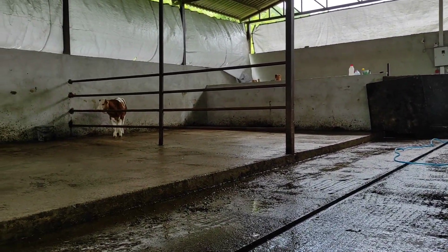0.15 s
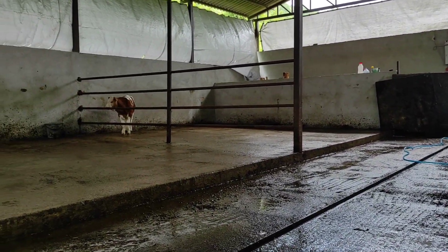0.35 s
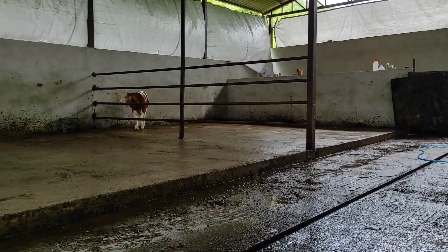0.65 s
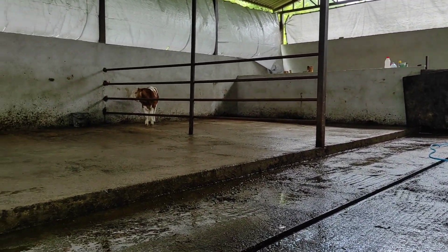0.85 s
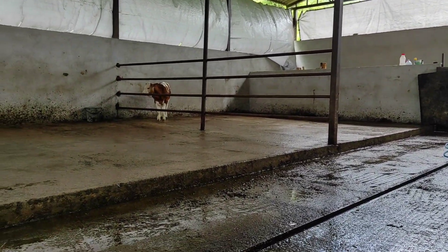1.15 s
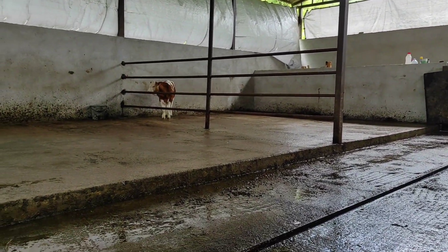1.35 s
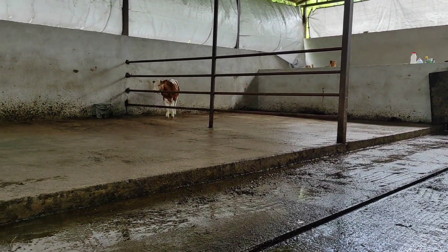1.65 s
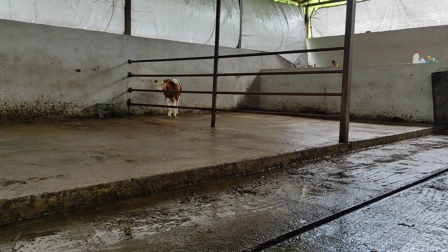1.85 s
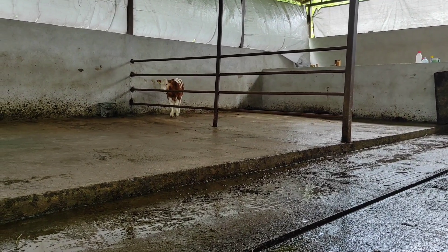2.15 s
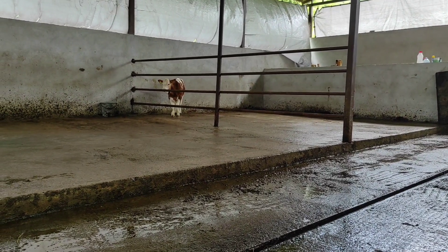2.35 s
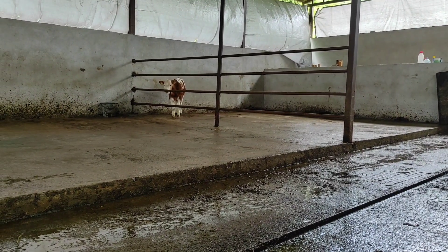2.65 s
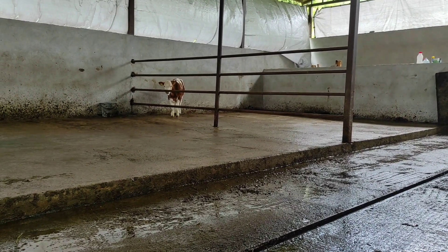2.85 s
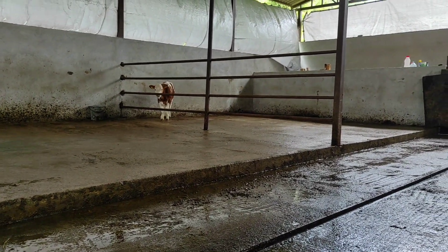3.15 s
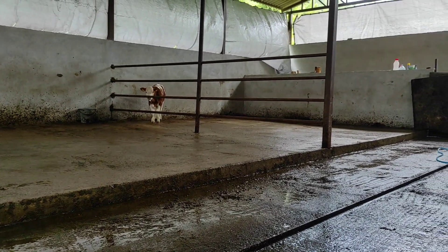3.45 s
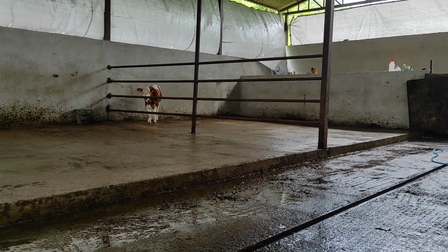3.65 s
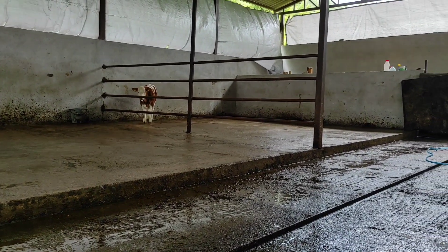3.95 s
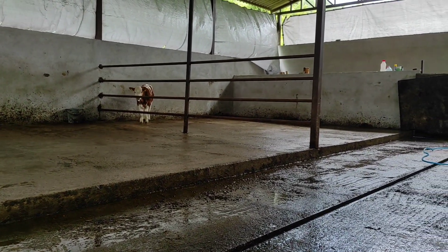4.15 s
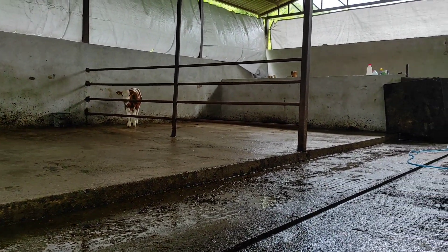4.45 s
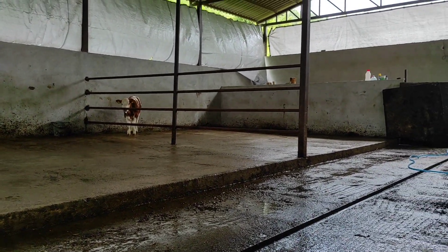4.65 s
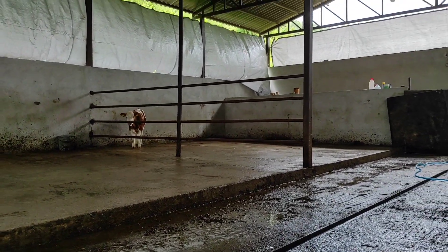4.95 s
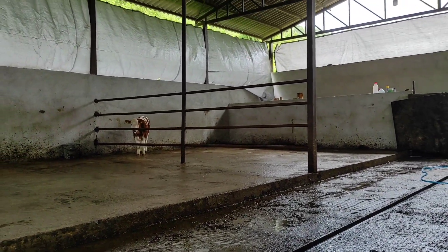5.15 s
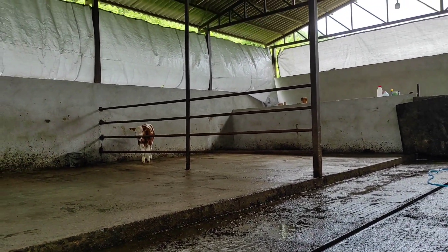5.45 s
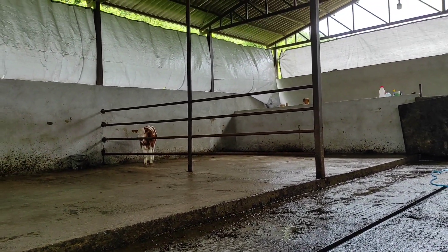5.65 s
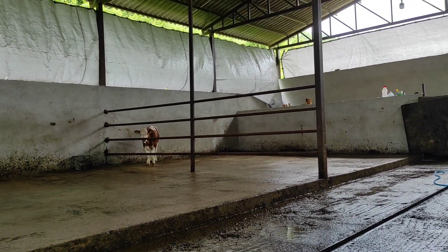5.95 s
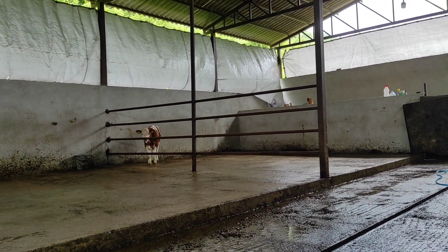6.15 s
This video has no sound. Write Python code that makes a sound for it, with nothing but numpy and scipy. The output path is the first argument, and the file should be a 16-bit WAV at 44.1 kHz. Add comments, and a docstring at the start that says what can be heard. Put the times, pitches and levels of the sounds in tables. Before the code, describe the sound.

Gritty scrapes of a metal blade on a wet barn floor, with clunks, small water spits and soft footfalls between strokes, walls echoing.

```python
"""Scraping a wet barn floor

A steel scraper is shoved over wet concrete in a barn: it lands lightly, is leaned on, eases and lifts.
Random clicks through filters make its juddering edge, the grinding grit and the swishing film of water.
Single impulses with short noise bursts make knocks, footfalls and spits; resonances make the blade ring.
Filtered noise makes a faint hiss like running water, low air and handling rumble; bare walls echo the work.
The microphone ports (openings) of a hand-held phone add a sharp treble resonance."""
import sys
import numpy as np
from scipy import signal
from scipy.fft import rfft, irfft, next_fast_len
from scipy.io import wavfile

SR = 44100
rng = np.random.default_rng(int(sys.argv[2]) if len(sys.argv) > 2 else 0)


def unload_wav(signal):
    """Save mono or channel-first audio to the path in sys.argv[1] as 16-bit WAV at rate SR, clipped to [-1, 1]."""
    wavfile.write(
        sys.argv[1],
        SR,
        np.round(np.clip(np.atleast_2d(signal).T, -1, 1) * 32767).astype(np.int16),
    )


N = 277389  # length in samples
TIME = np.arange(N) / SR  # seconds
SIZE = next_fast_len(N + SR)  # room for one extra second, so that filter tails do not wrap round
FREQ = np.arange(SIZE // 2 + 1) * SR / SIZE  # Hz

# Levels in the tables are relative: the functions trim, filter and mix each layer afterwards.
# Background hiss over time. Each row: time in seconds, level in dB.
HISS_LEVEL = [(0.0, -49), (0.18, -50.5), (0.29, -42), (0.5, -45.5), (1.75, -45), (2.42, -40.5),
              (2.62, -37.5), (2.8, -44), (5.0, -40), (5.8, -43), (6.29, -39)]
# Tone of the hiss. Each row: frequency in Hz, level in dB.
HISS_TONE = [(100, -15), (500, -5.5), (1300, -3), (3000, 0), (5000, 0), (7000, 3.5), (8500, 3.5),
             (11000, -4), (15000, -2.5)]
# Low air of the barn over time. Each row: time in seconds, level in dB.
AIR_LEVEL = [(0.0, -58.5), (1.7, -58.5), (2.4, -54), (3.2, -51.5), (3.7, -61.5), (6.29, -63.5)]
# Tone of the low air. Each row: frequency in Hz, level in dB.
AIR_TONE = [(25, -28), (100, -30), (150, 0), (230, 1.5), (400, -1.5), (700, -6.5), (1100, -6.5),
            (2000, -28)]
# Handling rumble over time. Each row: time in seconds, level in dB.
RUMBLE_LEVEL = [(0.0, -67), (1.1, -59.5), (1.6, -66), (2.3, -71), (2.65, -51), (3.3, -56), (5.1, -62),
                (6.29, -75)]
# Reverberation of the barn. Each row: frequency in Hz, time to die by 60 dB in seconds.
BARN_DECAY = [(150, 0.24), (550, 0.37), (800, 0.29), (1000, 0.45), (1400, 0.41), (2000, 0.42), (3200, 0.46),
              (7000, 0.3)]
# Treble resonance of the phone's ports: left in Hz, right in Hz.
PORT_HZ = (7570, 7310)
# Soft footfalls. Each row: time in seconds, level in dB.
STEPS = [(1.986, -42), (2.449, -37), (2.489, -52), (3.223, -40.5), (3.247, -50)]
# Water spitting from under the edge. Each row: time in seconds, level in dB.
SPITS = [(1.1563, -28), (2.082, -18.5), (2.5536, -24), (2.9544, -15), (3.0121, -19), (4.913, -14.5),
         (5.4412, -18)]
# The lifted scraper skimming back: middle in seconds, half length in seconds, level in dB.
SKIM = (2.3, 0.084, -55)
# The blade landing or catching on a ridge. Each row: time in seconds, level in dB,
# share of the hard crack in dB, share of the low thud in dB.
KNOCKS = [(0.326, -8, -11, -18), (0.375, -10.5, -22, -11), (0.652, -15, 2.5, -25),
          (1.042, -12.5, -4.5, -26), (1.156, -6.5, -1.5, -6), (2.556, -2.5, -18, -15),
          (2.611, -3.5, -9, -6.5), (2.922, -12.5, -6, -10), (3.014, -4.5, -4, -24), (3.308, -9.5, -23, -11),
          (3.804, -8.5, -20, -10), (4.292, -20, 3, -16), (4.37, -1.5, -12, -14), (4.567, -7, -6.5, -23),
          (4.856, -7, -9, -22), (4.913, -7.5, -5, -16.5), (4.992, -20, -19, -18), (5.441, -17, -4, -22),
          (5.613, -15.5, -24, -29)]
# Ringing modes of the blade. Each row: frequency in Hz, width in Hz, level in dB.
BLADE_MODES = [(340, 110, -14), (645, 65, -13), (855.4, 22, -6), (965, 14, -8), (1030, 12, -4),
               (1041, 23, -3), (1556, 42, -4), (1762, 25, 0), (2200, 22, -26)]
# Tones of the contact. Each row: frequency in Hz, level in dB.
JUDDER_TONE = [(40, -28.5), (105, -31), (150, -7), (210, -2.5), (280, 0.5), (420, 2), (580, 1), (720, -4),
               (900, -15), (1500, -28.5), (4000, -60.5)]
GRIND_TONE = [(150, -32), (450, -0.5), (700, -1), (900, 3.5), (1080, -1), (1350, -5), (2100, -10),
              (2900, -14), (5000, -30.5), (12000, -46.5)]
SWISH_TONE = [(900, -24.5), (1800, 9.5), (3000, 3), (4500, 3), (7000, 2), (9000, 1.5), (11000, -25),
              (15000, -22)]
CRACK_TONE = [(400, -16), (1200, 2.5), (2000, 10.5), (3000, -10), (6000, -9.5), (14000, -33)]
# Shoves. Each row: edge lands in seconds, full push in seconds, edge lifts in seconds,
# time to lean on in seconds, lighter on landing in dB, judder in dB, grinding in dB, swish in dB,
# sag of the push in dB per second.
STROKES = [ (-0.3, -0.1, 0.0097, 0.065, 8, -39, -32.5, -44.5, 16),
           (0.323, 0.497, 0.65, 0.084, 10.5, -29.5, -25.5, -41, 44),
           (1.027, 1.167, 1.341, .01, 12, -28, -25, -38.5, 45.5),
           (2.555, 2.614, 2.73, .025, 4.5, -32.5, -30, -38, 48),
           (2.917, 2.972, 3.036, 0.014, 7, -30, -27, -40, 0),
           (3.297, 3.378, 3.505, 0.052, 10, -32, -28, -44.5, -12),
           (3.799, 3.875, 4.002, 0.026, 9.5, -31, -28, -46, -2),
           (4.293, 4.37, 4.43, 0.0088, 11.5, -31.5, -24, -41.5, 10),
           (4.483, 4.537, 4.543, 0.057, 6.5, -38, -20.5, -42.5, 13),
           (4.849, 4.951, 5.108, 0.039, 9.5, -28.5, -24.5, -38, 15),
           (5.441, 5.552, 5.69, 0.079, 17.5, -30.5, -29.5, -44, 0.5), ]
# How a shove shapes each layer. Each row: share of the lightness on landing, extra sag in dB per second,
# release in dB per second.
JUDDER_SHAPE = (0.64, 33.6, 250)
GRIND_SHAPE = (0.84, 0.34, 208)
SWISH_SHAPE = (1.1, 2, 178)

LANDING_S = 0.0019  # time for the edge to settle on the floor
TOP_HZ = 15400  # the sound is cut above this


def undb(db):
    """Turn decibels into a gain."""
    return 10 ** (np.asarray(db) / 20)


def unit(x):
    """Scale a sound to an average (rms) strength of 1."""
    return x / np.sqrt(np.mean(x ** 2))


def follow(rows):
    """Gain over time, joining (seconds, dB) rows with straight lines in dB."""
    return undb(np.interp(TIME, *np.transpose(rows)))


def through(x, response):
    """Pass a sound through a filter given by its frequency response."""
    return irfft(rfft(x, SIZE) * response, SIZE)[..., :N]


def along(points):
    """Values at every frequency, joining (Hz, value) points over a logarithmic pitch scale."""
    hz, value = np.transpose(points)
    return np.interp(np.log(FREQ + 1), np.log(hz), value)


def colour(points):
    """Filter with the given (Hz, dB) outline that only sounds after its input (minimum phase)."""
    cepstrum = irfft(np.log(undb(along(points))), SIZE)
    causal = np.r_[cepstrum[0], 2 * cepstrum[1:SIZE // 2]]
    return np.exp(rfft(causal, SIZE))


def resonance(hz, width_hz):
    """One damped mode, with gain 1 at its centre."""
    return 1j * FREQ * width_hz / (hz ** 2 - FREQ ** 2 + 1j * FREQ * width_hz)


def walk(rate):
    """Random wandering around 0: straight lines between normal draws, 'rate' draws a second."""
    knots = rng.standard_normal(8192)
    return np.interp(TIME * rate, np.arange(len(knots)), knots)


def clicks(rate, spread_db):
    """Impulses at random times, about 'rate' a second, of uneven size and random sign, rms 1."""
    hit = rng.random(N) < rate / SR
    size = undb(spread_db * np.clip(rng.standard_normal(N), -2, 2))
    return unit(hit * size * rng.choice([-1, 1], N))


def blows(times, db, rattle_s, rattle):
    """Each blow is one impulse and a short dying rattle of the contact."""
    out = np.zeros(N)
    for t, gain in zip(times, undb(db)):
        start = max(int(t * SR), 0)
        age = TIME[:min(SR // 8, N - start)]
        burst = rng.standard_normal(len(age)) * np.exp(-age / rattle_s)
        out[start:start + len(age)] += gain * rattle * burst / np.linalg.norm(burst)
        out[start] += gain
    return out


def ports(pair, alike_hz):
    """Left and right from two unrelated spectra: long waves reach both ports alike, short ones do not."""
    alike = np.exp(-(FREQ / alike_hz) ** 2)
    mid = pair[0] * np.sqrt(1 + alike)
    side = pair[1] * np.sqrt(1 - alike)
    return np.array([mid + side, mid - side]) / np.sqrt(2)


def diffuse(points, alike_hz):
    """Noise from all around with the given spectrum, rms 1."""
    noise = rfft(rng.standard_normal((2, N)), SIZE)
    shaped = ports(noise, alike_hz) * undb(along(points))
    return unit(irfft(shaped, SIZE)[:, :N])


def running_hiss():
    """Noise like running water, wavering in level."""
    waver_db = 1.1 * walk(rate=36)
    return diffuse(HISS_TONE, alike_hz=400) * follow(HISS_LEVEL) * undb(-5.5 + waver_db)


def low_air():
    """Low noise of the air in the barn, swelling and fading at random."""
    return diffuse(AIR_TONE, alike_hz=328) * follow(AIR_LEVEL) * undb(3.4 * walk(rate=16))


def handling_rumble():
    """Deep, fitful noise from the hand on the phone."""
    rumble = diffuse([(25, -8.5), (80, -8.0), (200, -8.5), (600, -48)], alike_hz=25)
    return rumble * follow(RUMBLE_LEVEL) * undb(-4.5 + 4.6 * walk(rate=12))


def background():
    """The hiss, the low air and the rumble together."""
    return running_hiss() + low_air() + handling_rumble()


def tail(db):
    """Diffuse reverberation under the roof: it builds up quickly, and each band dies at its own rate."""
    age, hz = TIME[:SR], np.arange(SR // 2 + 1)
    edges = np.r_[0, np.geomspace(150, 9600, num=13), SR]  # band limits, Hz
    noise = rfft(rng.standard_normal((2, SR)))
    t60 = np.interp(hz, *np.transpose(BARN_DECAY))
    h = 0
    for lo, hi in zip(edges, edges[1:]):
        band = (hz >= lo) & (hz < hi)
        h = h + irfft(noise * band) * np.exp(-np.log(1000) * age / t60[band].mean())
    h = h * (1 - np.exp(-age / 0.019))  # build-up
    return undb(db) * h / np.linalg.norm(h, axis=1, keepdims=True)


def scatter(db, fade_s, density):
    """A quickly fading spray of reflections, different for each side, with the given energy."""
    size = rng.standard_normal((2, SR))
    present = rng.random((2, SR)) < density
    h = size * present * np.exp(-TIME[:SR] / fade_s)
    return undb(db) * h / np.linalg.norm(h, axis=1, keepdims=True)


def first_arrival(db, swing_rad, step_hz):
    """Sound bends round hand and phone: all pitches stay equally loud, but either port may lead."""
    knots = rng.standard_normal(512)
    wander = np.interp(FREQ / step_hz, np.arange(len(knots)), knots)
    # the lead changes sides along the spectrum and vanishes in the deepest lows
    phase = swing_rad * np.tanh(3 * wander) * FREQ / (FREQ + 90)
    return undb(db) * np.exp(1j * np.array([phase, -phase]))


def barn(x, shift_hz, count):
    """As the scraper travels, patterns of paths and echoes take turns in a repeating cycle; one tail stays."""
    out = through(x, ports(rfft(tail(db=-8), SIZE), alike_hz=318))
    for k in range(count):
        # each pattern fades in and out around its turn
        distance = np.abs((TIME * shift_hz - k + 1) % count - 1)
        share = np.cos(np.pi / 2 * np.minimum(distance, 1))
        spray = scatter(db=-6.5, fade_s=0.012, density=.05)
        near_walls = ports(rfft(spray, SIZE), alike_hz=282)
        direct = first_arrival(db=-3.5, swing_rad=.95, step_hz=350)
        out = out + through(x * share ** 2, direct) + through(x * share, near_walls)
    return out


def footfalls():
    """Boots pad on the concrete: soft blows through a low resonance, applied twice to narrow it."""
    pads = blows(*np.transpose(STEPS), rattle_s=0.02, rattle=3.8)
    return undb(36.0) * through(pads, resonance(hz=382, width_hz=173) ** 2)


def water_spits():
    """Water spits from under the edge: short bursts through a broad treble resonance."""
    bursts = blows(*np.transpose(SPITS), rattle_s=0.012, rattle=2.9)
    return undb(2.5) * through(bursts, resonance(hz=8000, width_hz=3500))


def blade(ring_db):
    """The blade passes the contact on and rings in its modes."""
    ringing = sum(undb(db) * resonance(hz, width) for hz, width, db in BLADE_MODES)
    return 1 + undb(ring_db) * ringing


def skim(body):
    """With no weight on it the edge only whispers: faint grinding that swells and fades."""
    middle, half, db = SKIM
    swell = undb(db) * np.maximum(1 - ((TIME - middle) / half) ** 2, 0)
    whisper = unit(through(clicks(rate=3000, spread_db=4), colour(GRIND_TONE) * body))
    return swell * whisper


def knocks():
    """A clunk of the scraper, a thud of its weight and a hard crack of steel on stone; the blade rings on."""
    s, db, crack_db, thud_db = np.transpose(KNOCKS)
    clunk_tone = undb(0.5) * colour(JUDDER_TONE) + colour(GRIND_TONE)
    clunk = through(blows(s, db, rattle_s=0.0036, rattle=2.24), clunk_tone)
    thud_tone = resonance(hz=214, width_hz=103) ** 2
    thud = through(blows(s, db + thud_db, rattle_s=0.03, rattle=0.74), thud_tone)
    # harder blows make a shorter contact, so their crack grows faster than their level
    hard_db = db + crack_db
    hard_db = hard_db + 0.82 * (hard_db - hard_db.max())
    crack = through(blows(s, hard_db, rattle_s=0.0064, rattle=3.02), colour(CRACK_TONE))
    contact = undb(1.5) * clunk + undb(31.5) * thud + undb(8.0) * crack
    return through(contact, blade(ring_db=7.0))


def shove(column, light_share, sag_db_per_s, release_db_per_s):
    """Gain of one layer: the edge lands lightly, is leaned on, eases as the arm stretches, and lifts."""
    gain = np.zeros(N)
    for lands, full, lifts, rise_s, light_db, *levels, sag in STROKES:
        contact = np.clip((TIME - lands) / LANDING_S + 1, 0, 1)
        lean = light_share * light_db * np.clip((TIME - full) / rise_s, -1, 0)
        # a negative total sag makes the push grow instead
        ease = (sag + sag_db_per_s) * np.clip(TIME - full, 0, max(lifts - full, 0))
        release = release_db_per_s * np.maximum(TIME - lifts, 0)
        gain += contact * undb(levels[column] + lean - ease - release)
    return gain


def scrape(body):
    """The edge sticks and slips; each slip also grinds more grit and squeezes out more water."""
    pressure = shove(0, *JUDDER_SHAPE)
    speed = shove(1, *GRIND_SHAPE)
    wetness = shove(2, *SWISH_SHAPE)
    slips = unit(undb(2.47 * walk(rate=130)))
    judder_clicks = slips * clicks(rate=700, spread_db=3.5)
    judder = unit(through(judder_clicks, colour(JUDDER_TONE) * body))
    grit = slips * clicks(rate=1800, spread_db=2.0)
    grind = colour(GRIND_TONE) * body
    # the shoves shape the grit before the blade, so the ringing outlasts them
    grinding = through(grit * speed, grind) / np.std(through(grit, grind))
    droplets = np.sqrt(slips) * clicks(rate=7000, spread_db=-1)
    swish = unit(through(droplets, colour(SWISH_TONE)))
    return undb(3.5) * pressure * judder + undb(1.38) * grinding + undb(2.5) * wetness * swish


def scene():
    """The scraper works in the barn over its background."""
    body = blade(ring_db=0)
    work = scrape(body) + knocks() + skim(body) + footfalls() + water_spits()
    return barn(work, shift_hz=6, count=6) + background()


def record(dry):
    """Each port resonates in the treble and has a notch above; the lows lean left; the top is cut."""
    # left minus right: (Hz, dB)
    lean_db = along([(60, 7.5), (250, 4.5), (1000, 2.5), (2000, -0.3),
                     (4500, -0.4), (7000, -2.0), (9000, 0.0), (13000, -1.5)])
    lean = undb(np.array([lean_db, -lean_db]) / 2)
    widths_hz = (1600, 1250)  # left, right
    cavity = np.array([hz ** 2 / (hz ** 2 - FREQ ** 2 + 1j * FREQ * width)
                       for hz, width in zip(PORT_HZ, widths_hz)])
    notch = 1 - 0.51 * resonance(hz=9780, width_hz=1140)
    sound = through(dry, cavity * notch * lean)
    top_cut = signal.ellip(10, .2, 70, TOP_HZ, fs=SR, output="sos")
    return signal.sosfilt(top_cut, sound)


dry = scene()
out = record(dry)
unload_wav(out)
```